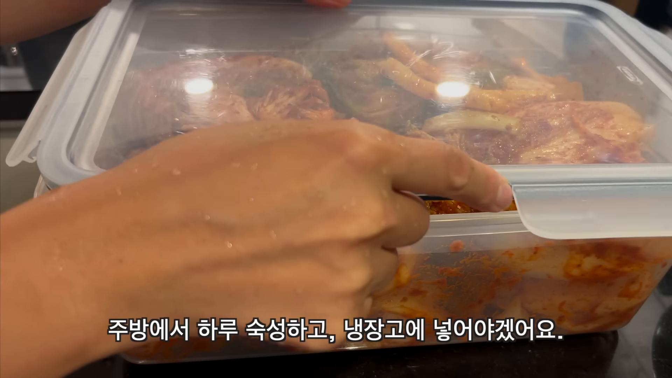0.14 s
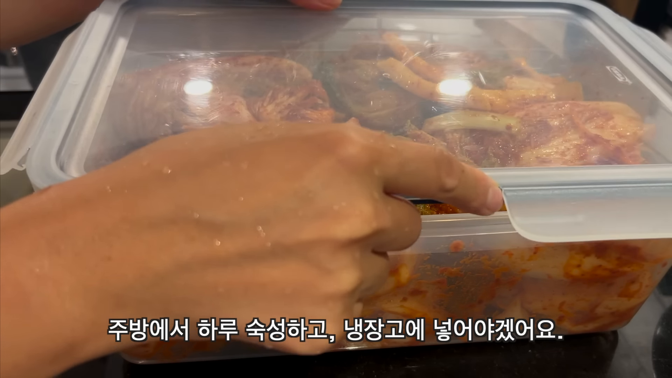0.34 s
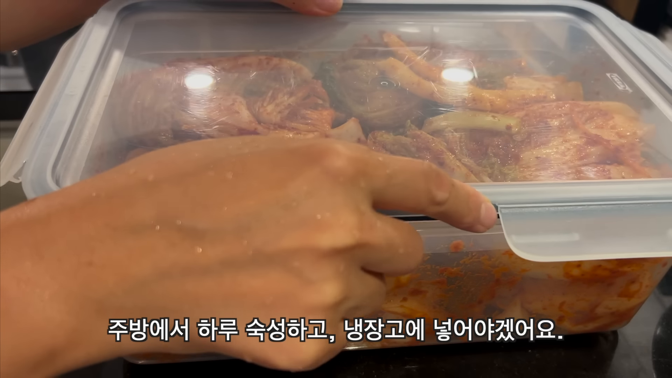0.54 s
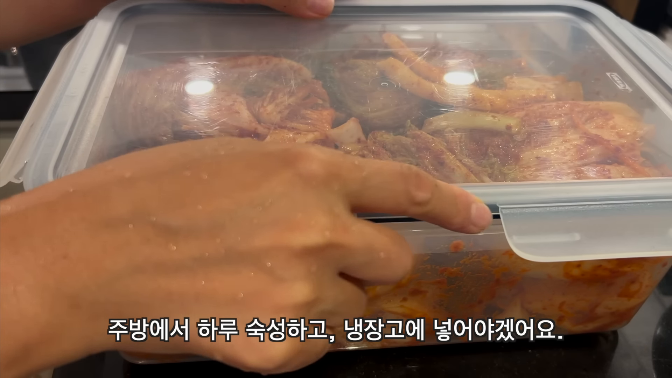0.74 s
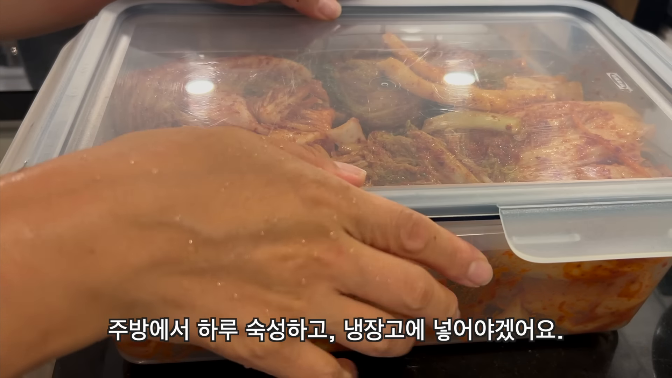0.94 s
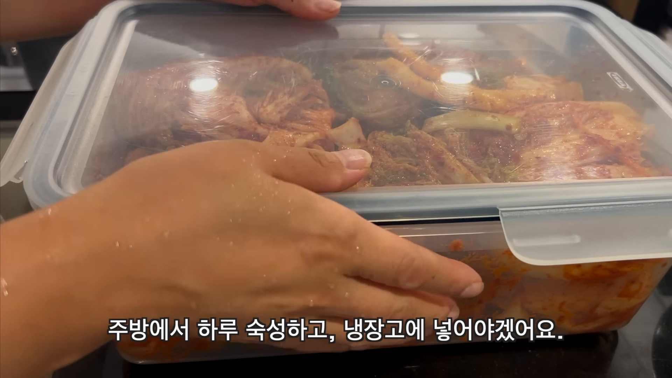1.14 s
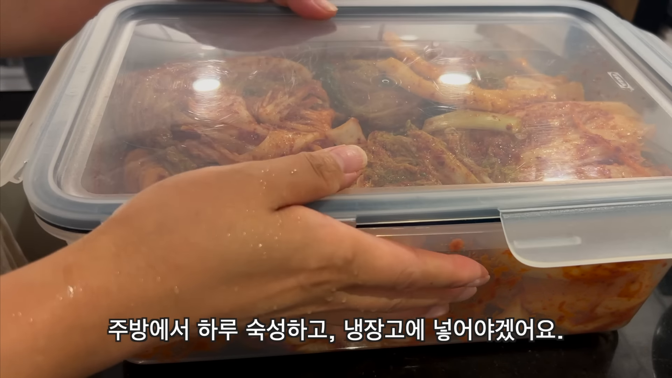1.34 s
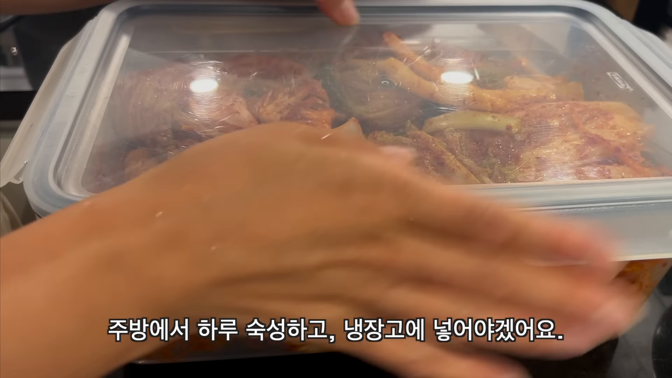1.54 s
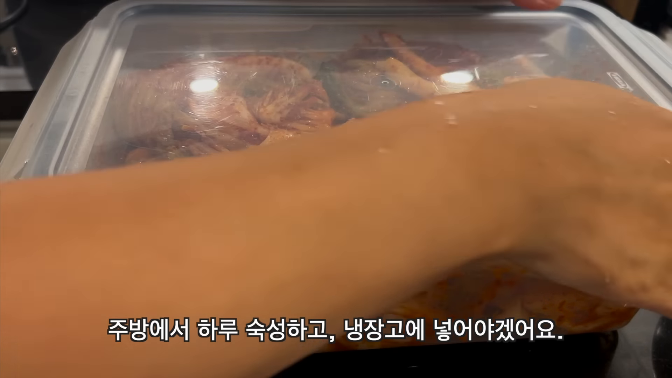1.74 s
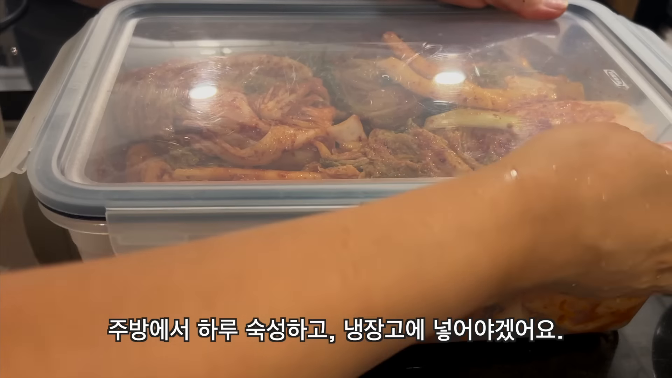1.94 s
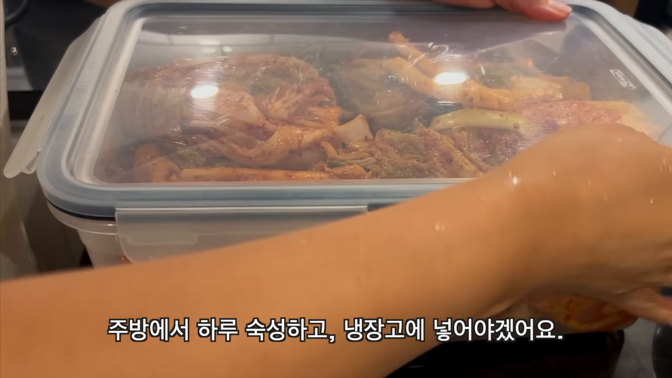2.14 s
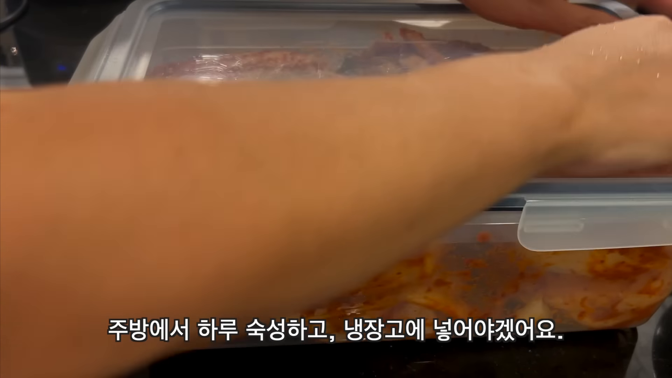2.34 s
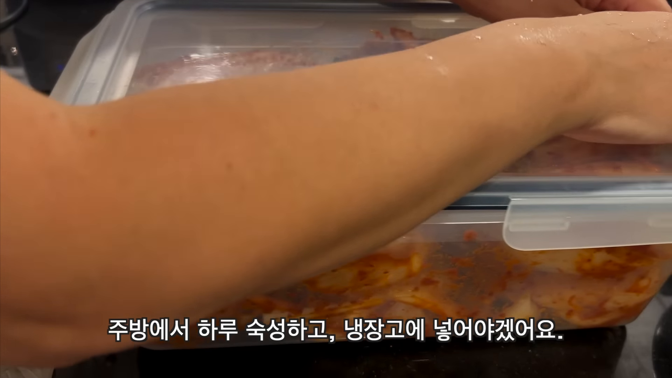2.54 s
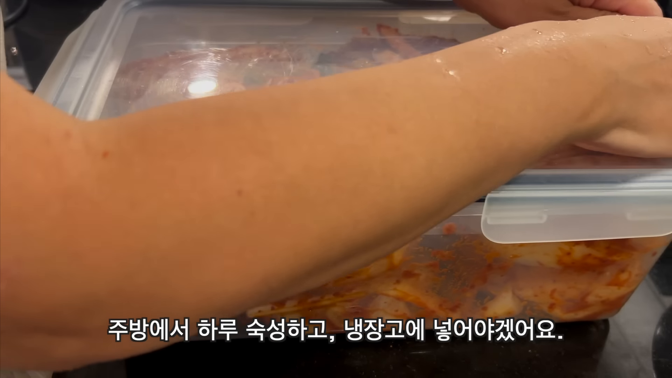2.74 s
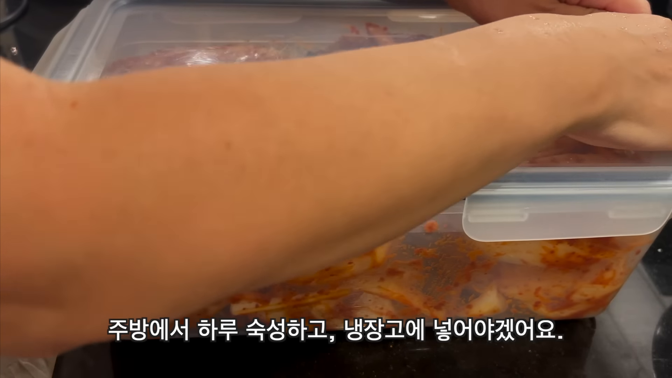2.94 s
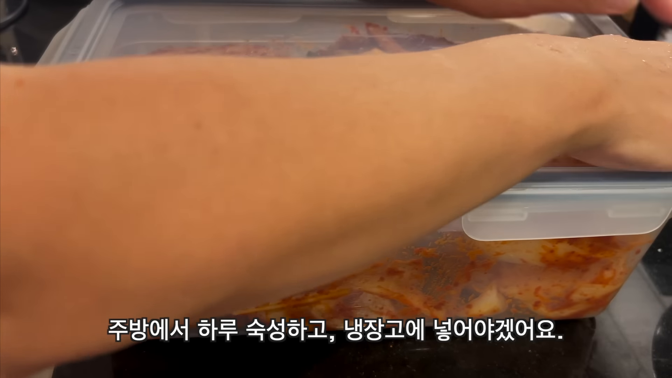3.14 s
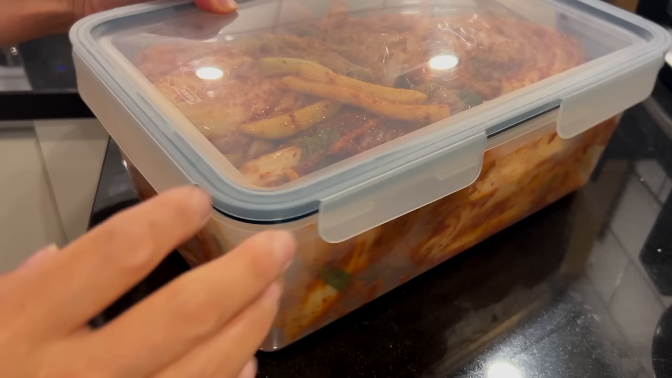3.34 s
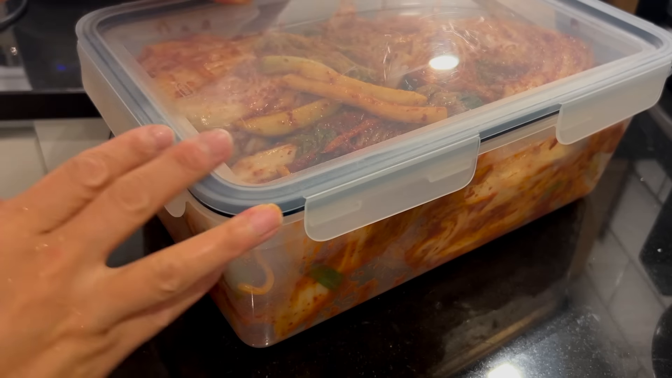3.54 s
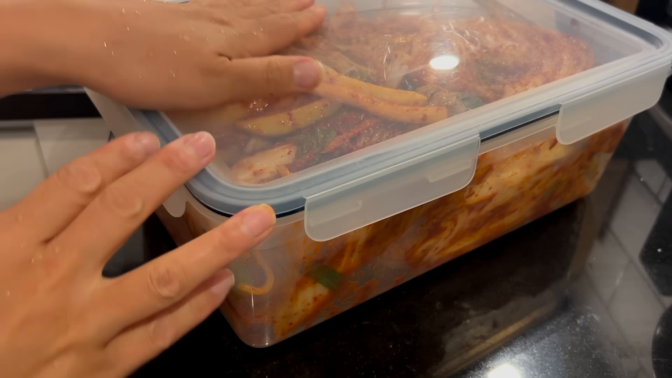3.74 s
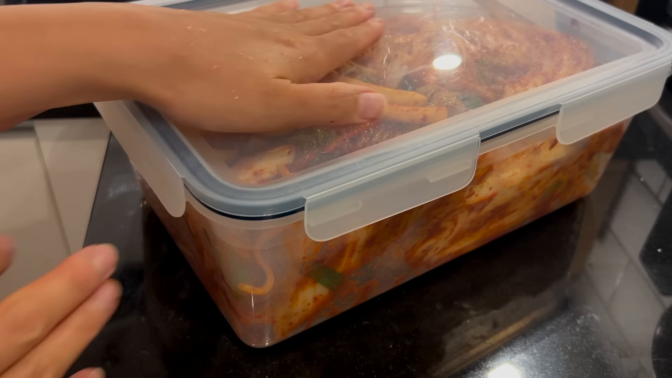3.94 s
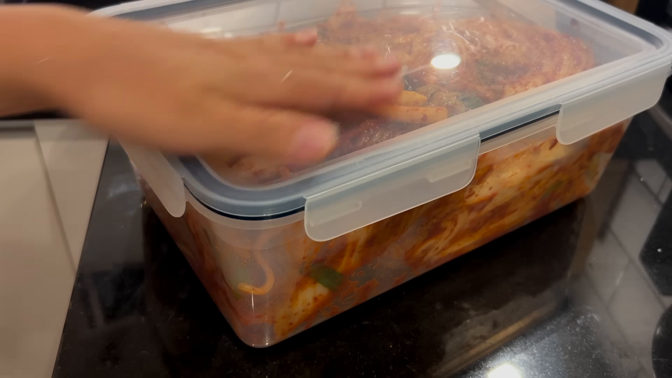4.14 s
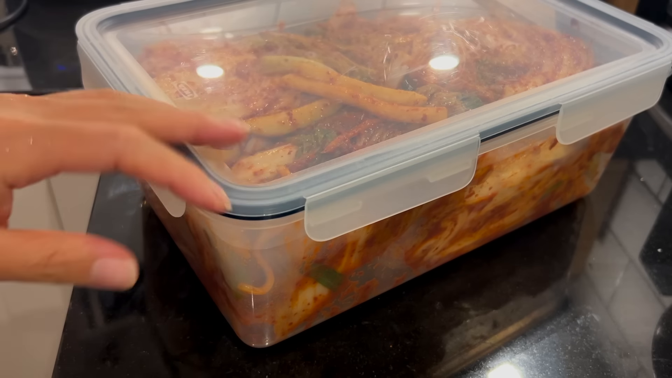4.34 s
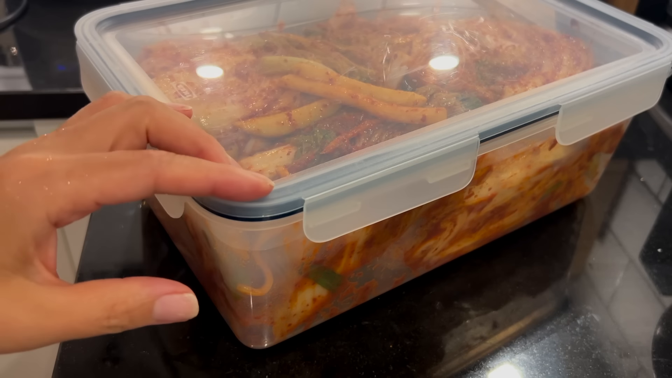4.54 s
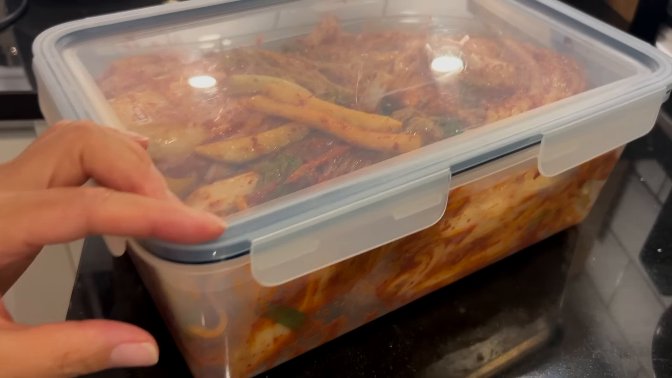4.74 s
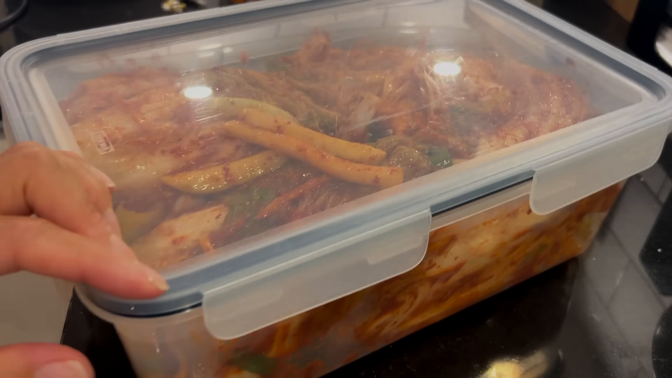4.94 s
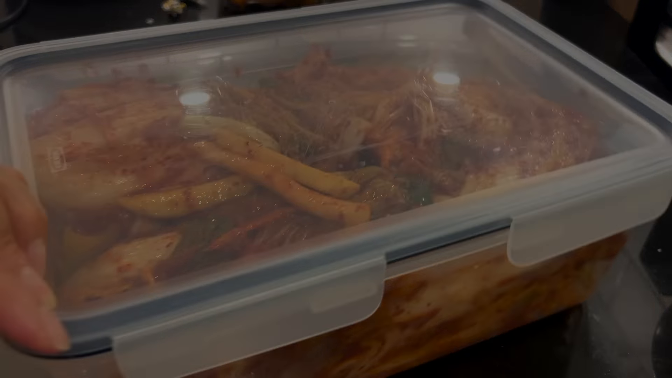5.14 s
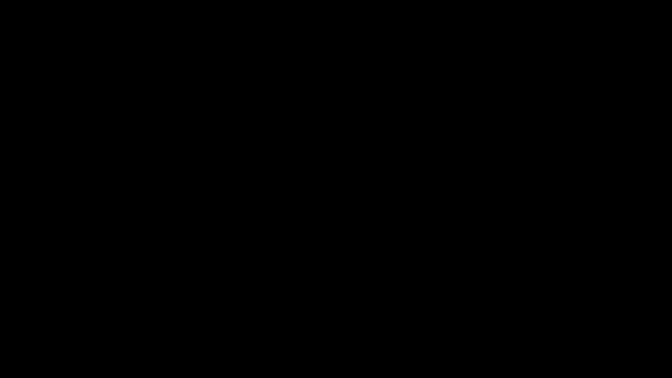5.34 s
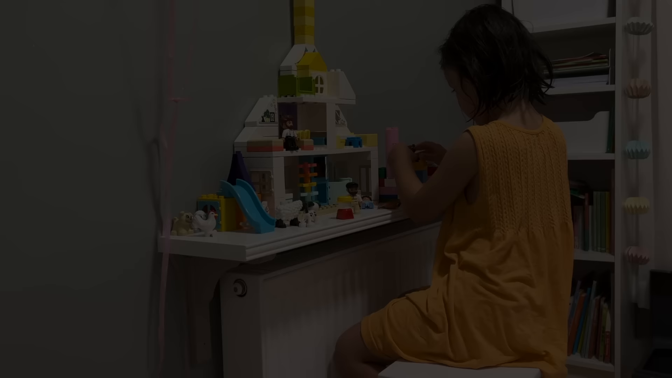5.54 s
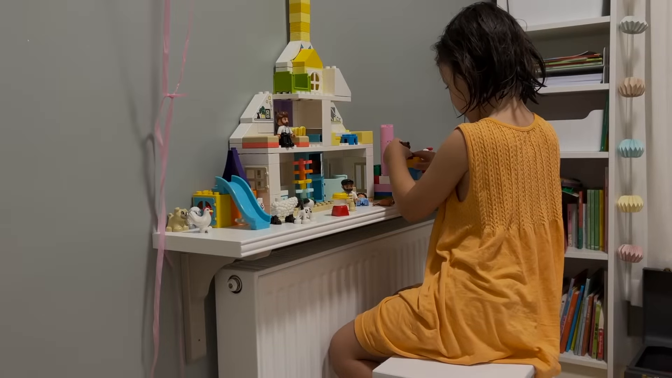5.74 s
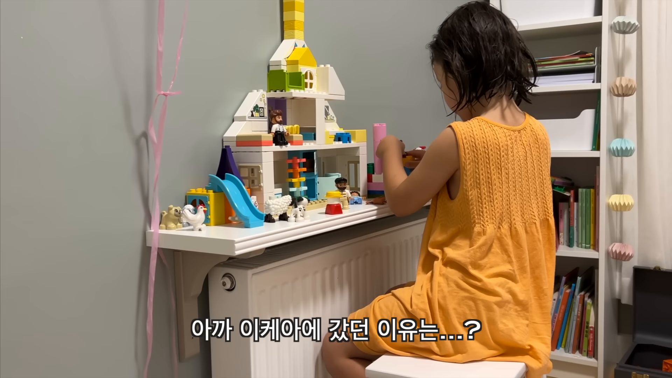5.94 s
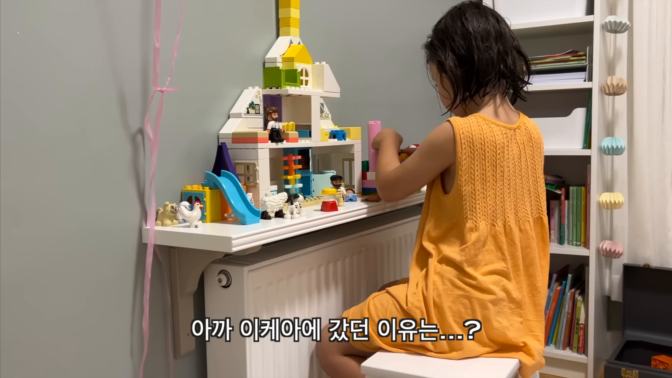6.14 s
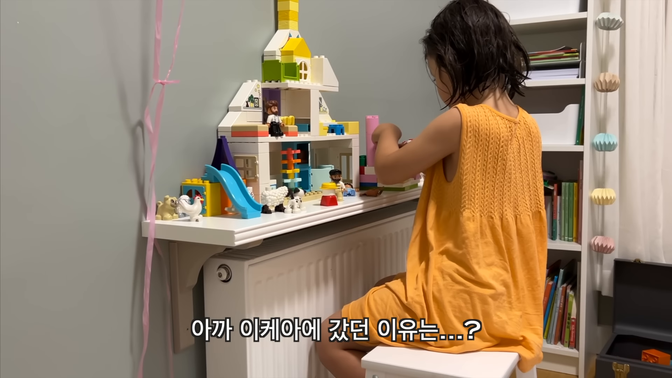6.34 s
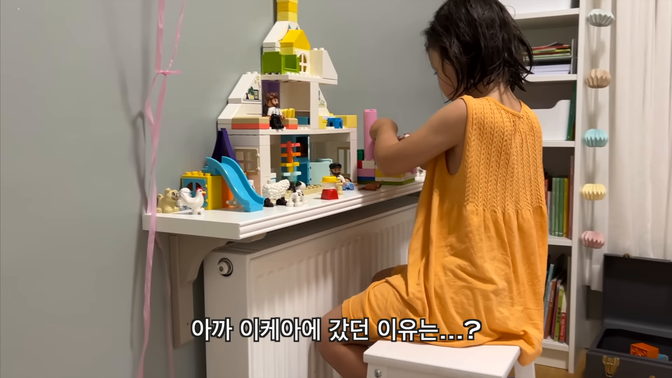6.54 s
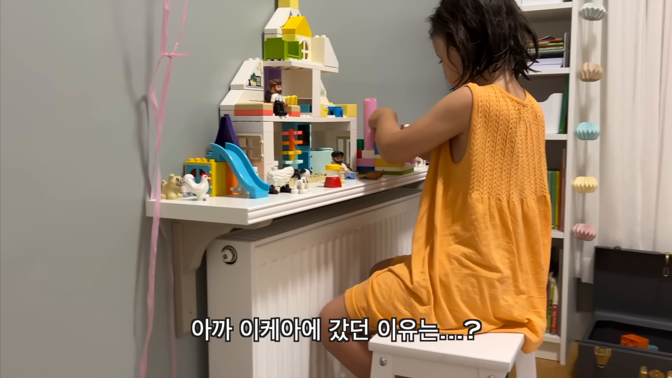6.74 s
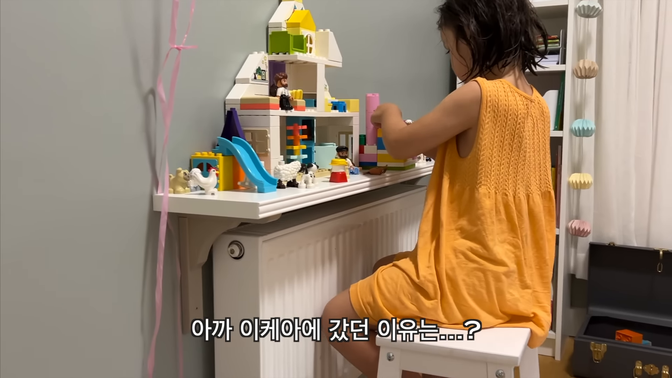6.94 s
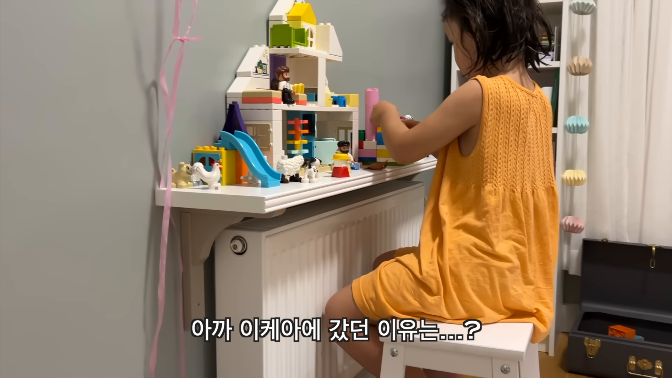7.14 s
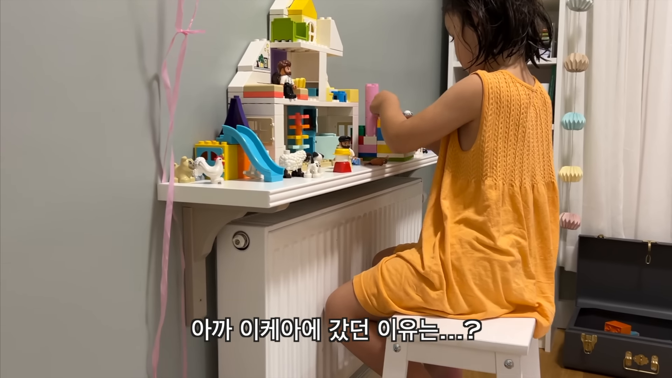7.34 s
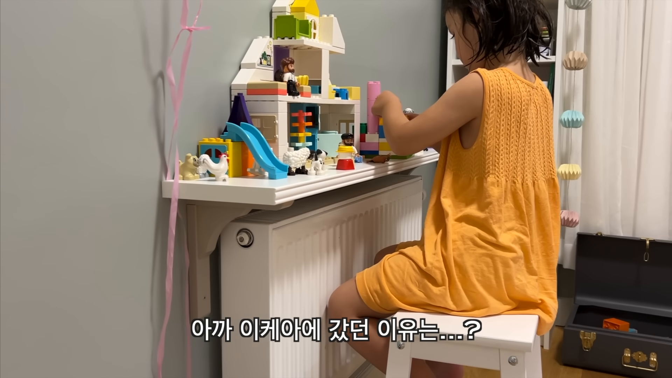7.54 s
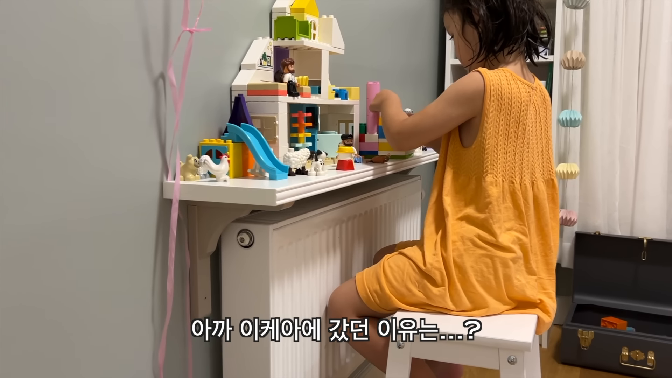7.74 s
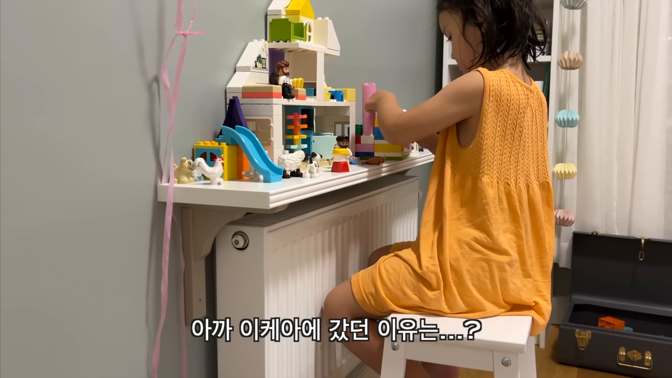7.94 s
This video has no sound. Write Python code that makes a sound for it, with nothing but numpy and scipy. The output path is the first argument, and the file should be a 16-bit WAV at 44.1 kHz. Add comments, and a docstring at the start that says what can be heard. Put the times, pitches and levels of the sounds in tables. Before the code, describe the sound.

Plastic lid clips snap shut on a food box amid rubbing fingers, then toy blocks clack softly in a quiet room.

```python
"""A kitchen, close to a small two-port microphone. Hands press a plastic lid onto a full food box:
the rim knocks, the clips snap shut, the box slips on the worktop, fingers rub, tap and squeak.
From 5.4 s the kitchen fades out. In a quiet, furnished room plastic toy blocks clack some way off,
and a faint noisy whistle swells and dies near 6.8 s. Low rumble and house hum lie under both rooms."""
import sys
import numpy as np
from scipy import signal
from scipy.fft import rfft, irfft, next_fast_len
from scipy.io import wavfile

SR = 44100
rng = np.random.default_rng(int(sys.argv[2]) if len(sys.argv) > 2 else 0)


def inscribe(sig):
    """Save sig as 16-bit PCM at rate SR to the path in sys.argv[1].

    A 1-D sig is mono; a 2-D sig holds one channel per row.
    Samples are clipped to [-1, 1] before scaling.
    """
    pcm = np.round(np.clip(np.atleast_2d(sig).T, -1, 1) * 32767)
    wavfile.write(sys.argv[1], SR, pcm.astype(np.int16))


N = 352844

# The slow course of two noises. Each row: time in seconds, midrange noise in dB, low rumble in dB.
NOISE_LEVELS = [(0.0, -59, -55.5), (0.5, -88, -46.5), (0.6, -48, -43), (0.8, -60, -51),
                (1.55, -67.5, -51.5), (2.25, -50, -51.5), (2.55, -63, -46.5), (3.1, -66, -51.5),
                (3.48, -69, -49.5), (4.04, -64.5, -51.5), (4.44, -71.5, -50), (5.04, -65, -52),
                (5.3, -67.5, -53.5), (5.55, -80.5, -60), (5.9, -67.5, -64), (6.35, -69.5, -68.5),
                (6.85, -72.5, -70), (7.1, -79.5, -75.5), (8.0, -79.5, -74)]


def food_box():
    """Close by, lid and worktop strike the filled box; it rings and the kitchen walls answer."""
    # Knocks, snaps and taps. Each row: start in seconds, crack, boom, knock and brightness in dB,
    # favoured knock pitch in Hz.
    lid_blows = [(0.076, -28, -63, -31, 5.5, 580), (0.1219, -15.5, -37.5, -13.5, -5, 737),
                 (0.2821, -22, -42.5, -20, -4.5, 630), (0.3942, -34.5, -88, -30.5, -15, 566),
                 (0.4463, -37, -42, -16.5, -20, 755), (0.4631, -13, -66, -9, -4.5, 473),
                 (0.5034, -54, -22.5, -22.5, -5, 407), (0.615, -49, -36, -19.5, 2.5, 420),
                 (1.1585, -15.5, -29.5, 3, -6, 411), (1.2099, -4, -29, 1, -3.5, 434),
                 (1.2238, -27, -61, -7, -18, 467), (1.296, -2.5, -34, -4, -3, 402),
                 (1.529, -45.5, -55, -35, -5, 382), (1.811, -25, -33, -32.5, -7, 352),
                 (1.8642, -23, -31, -24.5, -18, 356), (1.8885, -20.5, -21.5, -19, -8, 346),
                 (1.916, -44, -28, -27, -18, 409), (1.948, -14, -16.5, -6, -7, 408),
                 (1.981, -2, -23, -24, -14, 690), (1.9989, -4, -21, -3.5, 1.5, 380),
                 (2.3594, -48, -39, -29.5, 13, 283), (2.4535, -41, -56, -36, -16, 330),
                 (2.501, -45.5, -44, -34.5, -20, 310), (2.547, -27, -45, -25.5, -0.5, 344),
                 (2.7856, -46, -33, -38.5, -2, 370), (2.8561, -40, -54, -33.5, -19, 352),
                 (2.886, -46, -53, -49, -27, 600), (2.9731, -42, -34.5, -41, -12, 388),
                 (3.2261, -39.5, -25, -63, -5, 348), (3.2328, -43, -25.5, -25.5, -14, 355),
                 (3.2792, -76.5, -29, -63.5, 6.5, 287), (3.4816, -44, -47, -63, -20, 311),
                 (4.1853, -30, -35.5, -45, 8, 347.5), (4.1997, -41, -27, -22, -36, 287),
                 (4.3139, -24.5, -77, -36.5, 4.5, 484), (4.367, -43, -70, -38, -7, 600)]
    # The box slips and rattles on the worktop. Each row: start in seconds, crack, boom, knock, clack,
    # tick and room send in dB, contact time in ms, favoured knock pitch in Hz.
    slips = [(.095, -33, -59, -80, -29, -77, -1, 12, 500),
             (.54, -33.5, -56, -69.5, -30, -51.5, 16.5, 10.6, 500),
             (1.014, -14, -47, -23.5, -26.5, -45.5, 15, 19.2, 600),
             (1.03, -34.5, -15, -29, -24, -61.5, 16, 4.5, 575),
             (2.0, -14, -30, -23, -2.5, -34, -0.5, 6, 657.4), (4.15, -36, -39, -36, -42, -38, -2, 25, 600),
             (5.295, -38.5, -44, -44.5, -50.5, -47.5, 13.5, 15.7, 400)]
    # Modes of box and lid. Each row: pitch in Hz, level in dB, seconds to fall 60 dB.
    box_modes = [(96.3, -6, 0.28), (151, -5.5, 0.11), (197, 2, 0.1), (262.5, -13.5, 0.021),
                 (312, -14.5, 0.24), (380, 10, 0.051), (524.2, 14.5, 0.026), (639, 15.5, 0.046),
                 (753, -1.5, 0.24), (927, 4, 0.0085), (1393, -3.5, 0.0092), (2105, -27.5, 0.1),
                 (2125, -4.5, 0.024), (3580, -22, 0.0038)]
    # Kitchen reverberation. Each row: frequency in Hz, seconds to fall 60 dB.
    kitchen_decay = [(100, 0.44), (400, 0.56), (1200, 0.33), (3000, 0.49), (7000, 0.31), (14000, 0.067)]
    direct, send = strike(contacts(lid_blows, contact_ms=.45, send_db=2) + slips, box_modes)
    return direct + amp(-9.5) * room(send, kitchen_decay)


def toy_blocks():
    """Some way off, blocks clack and ring with the shelf; much of the sound arrives by the walls."""
    # Each row: start in seconds, crack, boom, knock and brightness in dB.
    clacks = [(5.68, -42.5, -61.5, -46.5, -7.5), (5.7604, -51, -55, -47.5, -23.5),
              (5.8226, -39, -53.5, -40, -20), (6.016, -47, -69.5, -50, 1.5),
              (6.1512, -43.5, -57.5, -58.5, 0), (6.1849, -34, -44.5, -39, 7),
              (6.2936, -48.5, -67, -56, -1.5), (6.4202, -37, -55, -41, -6.5),
              (6.6913, -59, -73.5, -57.5, -12.5), (6.8538, -52, -43, -41, 0),
              (6.8819, -57, -64.5, -65.5, -13.5), (6.9762, -59, -53.5, -70, -5),
              (7.3242, -46, -68, -52.5, -1), (7.418, -65, -50, -60, -6.5), (7.545, -78, -54.5, -66, -8.5),
              (7.9443, -44.5, -70, -49.5, 3.5)]
    # Modes of blocks and shelf. Each row: pitch in Hz, level in dB, seconds to fall 60 dB.
    shelf_modes = [(105, 5, 0.032), (260, 5, 0.043), (335, -4, 0.11), (456, -18, 0.027), (630, 13, 0.015),
                   (1060, -4.5, 0.022), (1730, -8, 0.013), (2630, -2.5, 0.012), (3750, -10, .008)]
    # Reverberation of the furnished room. Each row: frequency in Hz, seconds to fall 60 dB.
    playroom_decay = [(100, 0.26), (400, 0.4), (1200, 0.3), (3000, 0.36), (7000, 0.36), (14000, 0.07)]
    knock_hz = 600
    events = contacts([row + (knock_hz,) for row in clacks], contact_ms=1.11, send_db=-6)
    direct, send = strike(events, shelf_modes)
    return amp(-1) * direct + amp(16) * room(send, playroom_decay)


def contacts(rows, contact_ms, send_db):
    """Complete each blow for strike(): a brighter one has less clack and more tick."""
    events = []
    for start, crack_db, boom_db, knock_db, bright_db, knock_hz in rows:
        clack_db = crack_db - 9 + .061 * (knock_db - crack_db) - .49 * bright_db
        tick_db = crack_db - 10.5 + .7 * bright_db
        wall_db = send_db - .0375 * crack_db   # weak cracks send a larger share to the room
        events.append((start, crack_db, boom_db, knock_db, clack_db, tick_db,
                       wall_db, contact_ms, knock_hz))
    return events


def strike(events, modes):
    """Bursts of gritty force ring the modes and are heard as cracks. Returns direct sound, room send."""
    # What a blow sends to the walls. Each row: frequency in Hz, gain in dB.
    to_walls = [(50, 2), (130, 37), (450, 24.5), (1150, 30), (2100, 20), (3000, 12.5), (10000, 17),
                (16500, 9)]
    part_hz = (130, 450, 1150, 3000, 10000)   # boom, knock, clack, crack, tick
    direct, send = np.zeros((2, N + SR)), np.zeros(N + SR)
    size = 8192
    t, grid_hz = np.arange(size) / SR, np.arange(1, size // 2 + 2) * SR / size
    hz, mode_db, t60 = np.array(modes).T[:, :, None]
    low = hz[:, 0] < 800   # slow modes feel one smooth push, fast ones the grit
    push = t * np.exp(-t * 1000 / .6)
    push = rfft(push / push.sum())
    signs, per_port = (-1.) ** np.arange(len(modes))[:, None], (2, len(modes), 1)
    for start, crack_db, boom_db, knock_db, clack_db, tick_db, send_db, contact_ms, knock_hz in events:
        spectrum = list(zip(part_hz, [boom_db, knock_db, clack_db, crack_db, tick_db]))
        # where the blow lands picks the knock
        off_pitch_db = -14 * np.minimum(np.abs(np.log2(hz / knock_hz)), 1) * (hz > 260) * (hz < 800)
        strength = signs * amp(at_hz(spectrum, hz) + mode_db + off_pitch_db + rng.normal(0, 1.2, per_port))
        phase = rng.normal(0, 1, per_port) * np.minimum(hz / 1800, .7)   # each port hears another part
        rings = strength * np.sin(2 * np.pi * hz * t + phase) * amp(-60 * t / t60)
        slow, fast = rfft(rings[:, low].sum(1)), rfft(rings[:, ~low].sum(1))
        age = t * 1000 / contact_ms
        burst = age * np.exp(-age)
        burst /= np.linalg.norm(burst)
        grit = rfft(burst * rng.standard_normal(size))
        port_grit = rfft(burst * rng.standard_normal((2, size)))
        onset = grit if contact_ms > 4 else 1   # a short contact starts with one clean step
        force = .8 * onset + .6 * grit + .45 * port_grit * np.clip(2200 / grid_hz, .2, 1)
        crack_curve = [(300, -97)] + spectrum[2:] + [(13500, tick_db - 1.5), (16500, tick_db - 7.5)]
        crack = minimum_phase(at_hz(crack_curve, grid_hz) + 19)
        i = round(start * SR)
        direct[:, i:i + size] += irfft(slow * onset * push + force * (fast + crack), size)
        # the walls get the sound of all sides at once, its pitches only faintly marked
        spread = minimum_phase(at_hz(spectrum, grid_hz) + at_hz(to_walls, grid_hz))
        send[i:i + size] += amp(send_db) * irfft(onset * spread + amp(-9) * force[0] * fast[0], size)
    return direct[:, :N], send[:N]


def skin_rub(noise):
    """Skin hisses over plastic in strokes; the resting hands fade with the kitchen, a faint hiss stays."""
    # Each row: start in seconds, length in seconds, level in dB.
    strokes = [(0.0, 0.088, -75), (0.257, 0.2, -67.5), (0.634, 0.29, -67), (1.49, 0.72, -60),
               (2.215, .28, -62), (2.523, 0.27, -79), (2.971, 0.084, -60), (3.113, 0.05, -63),
               (3.38, 0.049, -66.5), (3.473, 0.088, -64.5), (3.687, 0.33, -62.5), (4.074, 0.27, -57),
               (4.408, .06, -65), (4.571, 0.69, -65.5), (6.17, 0.079, -54)]
    # Colour of the rubbing. Each row: frequency in Hz, noise density in dB.
    skin_colour = [(1200, -11.5), (2500, -2), (4500, 2.5), (7000, -0.5), (10000, 1), (13000, -2),
                   (15000, -7.5), (16500, -30)]
    resting_db, hiss_db, fade_s, fade_db_per_s = -74.5, -84, 5.4, 91
    attack_s, release_s = .022, .013
    t = np.arange(N) / SR
    gain = amp(resting_db - fade_db_per_s * np.maximum(t - fade_s, 0)) + amp(hiss_db)
    for start, length, db in strokes:
        rise = np.clip((t - start) / attack_s, 0, 1)
        gain += amp(db) * rise * np.exp(-np.maximum(t - start - length, 0) / release_s)
    return gain * coloured(noise, [(600, -50)] + skin_colour)


def finger_squeaks():
    """Damp fingers squeak on the lid: short, rough, gliding tones."""
    # Each row: start and length in seconds, first and last pitch in Hz, level in dB.
    glides = [(3.138, 0.045, 960, 980, -57.5), (4.019, .028, 4460, 2110, -54),
              (4.102, 0.052, 2150, 1950, -64), (4.148, 0.03, 1780, 2350, -52)]
    out, roughness = np.zeros(N), 1 + .6 * drift(150)
    for start, length, from_hz, to_hz, db in glides:
        i, count = round(start * SR), round(length * SR)
        tone = np.sin(2 * np.pi * np.cumsum(np.geomspace(from_hz, to_hz, count)) / SR)
        out[i:i + count] += amp(db) * np.hanning(count) ** .5 * tone
    return out * roughness


def midrange_noise(noise):
    """Faint noise: the box creaking in the kitchen, then the playroom's soft reverberation."""
    # Each row: frequency in Hz, noise density in dB.
    mid_colour = [(250, -13), (500, 5), (900, -1), (1500, 1.5), (2200, -10), (3500, -13)]
    mid_db, _ = in_time(NOISE_LEVELS)
    return amp(mid_db) * coloured(noise, [(100, -50)] + mid_colour + [(7000, -50)])


def whistle():
    """Faint noise in one narrow resonance, swelling slowly and dying faster."""
    pitch_hz, peak_s, swell_s, die_s = 1540, 6.82, .1, .052
    b, a = signal.iirpeak(pitch_hz, Q=9, fs=SR)
    tone = signal.lfilter(b, a, signal.lfilter(b, a, rng.standard_normal((2, N))))
    t = np.arange(N) / SR - peak_s
    swell = np.exp(-.5 * (t / np.where(t < 0, swell_s, die_s)) ** 2)
    return amp(-65) * swell * rms_one(tone)


def rumble_and_hum(noise):
    """A low rumble, weaker in the second room, over the deep hum of the house."""
    # Each row of both: frequency in Hz, noise density in dB.
    rumble_colour = [(12, -44), (20, -9), (43, 7.5), (134, 3), (219, -0.5), (258, -14), (313, 1),
                     (455, -35), (497, -19.5), (700, -30.5), (910, -55), (1540, -120)]
    hum_colour = [(20, -24.5), (35, -9), (50, 3.5), (70, -9), (110, -29), (300, -68.5)]
    _, rumble_db = in_time(NOISE_LEVELS)
    return amp(rumble_db) * coloured(noise, rumble_colour) + amp(-66.5) * coloured(noise, hum_colour)


def room(send, decays):
    """The walls return a diffuse tail that builds within a few ms and dies band by band."""
    t = np.arange(SR) / SR
    tail = sum(band * amp(-60 * t / at_hz(decays, hz)) for hz, band in diffuse_bands(SR))
    tail *= 1 - np.exp(-(t / .0009) ** 2)
    return signal.fftconvolve(send[None], tail / np.sqrt(np.sum(tail ** 2) / 2), axes=1)[:, :N]


def diffuse_bands(count):
    """Yield centre in Hz and stereo noise of each half octave, as the two ports hear diffuse sound."""
    # Each row: frequency in Hz, likeness of left and right from 0 to 1.
    likeness = [(60, 0.79), (300, 0.92), (1000, 0.038), (2400, 1), (5000, 0.39), (8000, 1), (10000, 1),
                (15000, 0.86)]
    edges_hz = 22 * 2 ** np.arange(0, 9.8, .5)
    white = rng.standard_normal((2, 2, count))
    for k, (low, high) in enumerate(zip(edges_hz, edges_hz[1:])):
        bandpass = signal.butter(2, [low, high], "band", fs=SR, output="sos")
        mid, side = signal.sosfilt(bandpass, white[k % 2])
        hz = np.sqrt(low * high)
        alike = at_hz(likeness, hz)
        yield hz, np.sqrt(1 + alike) * mid + np.sqrt(1 - alike) * side * [[1], [-1]]


def coloured(noise, colour):
    """Mix noise bands along a level curve, at unit rms."""
    return rms_one(sum(band * amp(at_hz(colour, hz)) for hz, band in noise))


def drift(rate_hz):
    """A smooth random wander of spread 1."""
    pole = np.exp(-80 * np.pi * rate_hz / SR)
    slow = signal.lfilter([1], [1, -2 * pole, pole * pole], rng.standard_normal(N // 40 + 2002))[2000:]
    return np.interp(np.arange(N) / 40, np.arange(len(slow)), rms_one(slow))


def minimum_phase(db):
    """The causal response of a level curve on an FFT grid."""
    cepstrum = irfft(np.log(amp(db)))
    cepstrum[1:len(db) - 1] *= 2
    cepstrum[len(db):] = 0
    return np.exp(rfft(cepstrum))


def amp(db):
    """Decibels to gain."""
    return 10 ** (np.asarray(db) / 20)


def rms_one(x):
    """Scale to unit rms."""
    return x / np.sqrt(np.mean(x ** 2) + 1e-20)


def in_time(rows):
    """Each column of a curve table, sample by sample."""
    seconds, *columns = np.transpose(rows)
    return [np.interp(np.arange(N) / SR, seconds, column) for column in columns]


def at_hz(points, hz):
    """Read a table on a log-frequency axis."""
    table_hz, values = np.transpose(points)
    return np.interp(np.log(hz), np.log(table_hz), values)


def scene():
    """Box and hands close by in the kitchen, then blocks farther off in the other room."""
    impacts = food_box() + toy_blocks()
    flicker = amp(1.3 * drift(8))
    # each band also flickers on its own
    noise = [(hz, band * amp(1.6 * drift(14))) for hz, band in diffuse_bands(N)]
    rustle = flicker * (skin_rub(noise) + midrange_noise(noise))
    return impacts + rustle + whistle() + finger_squeaks() + rumble_and_hum(noise)


def record(dry):
    """The microphone loses deep bass, turns its ports' phases apart, rounds peaks and cuts the top."""
    # Steady offset between the ports. Each row: frequency in Hz, lead of the right in radians.
    port_phase = [(0, 0), (700, .1), (1700, -.3), (3400, -.8), (4800, -.3), (6200, .4), (7600, .6),
                  (8600, 1.8), (10000, 3.14), (11700, 5.1), (13100, 6.28), (14500, 7.9), (16500, 10)]
    low_cut_hz, high_cut_hz = 45.6, 16500
    size = next_fast_len(N + 4096)
    turn = np.interp(np.arange(size // 2 + 1) * SR / size, *np.transpose(port_phase))
    thin = signal.sosfilt(signal.butter(3, low_cut_hz, "high", fs=SR, output="sos"), dry)
    ported = irfft(rfft(thin, size) * np.exp(.5j * turn * np.array([[-1], [1]])), size)[:, :N]
    rounded = 1.2 * np.tanh(ported / 1.2)
    return signal.sosfilt(signal.cheby2(12, 70, high_cut_hz, fs=SR, output="sos"), rounded)


dry = scene()
out = record(dry)
inscribe(out)
```